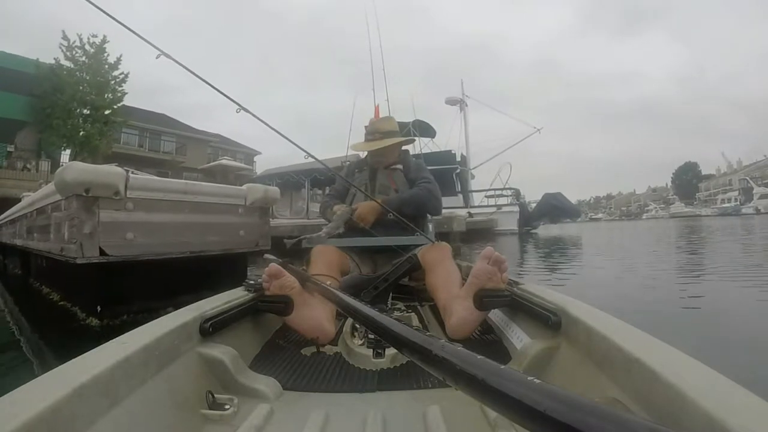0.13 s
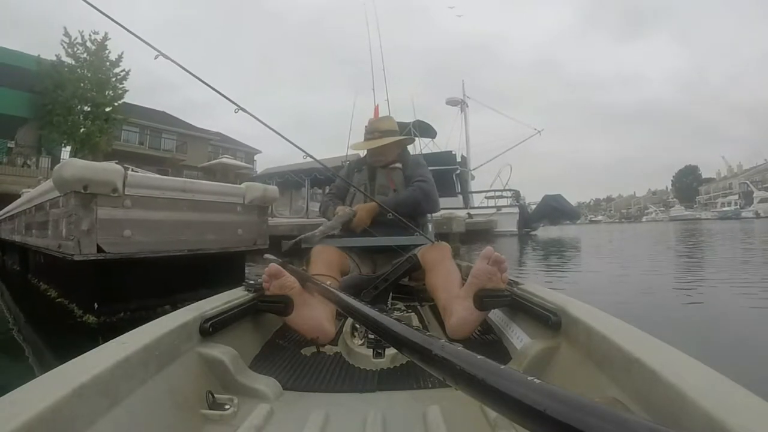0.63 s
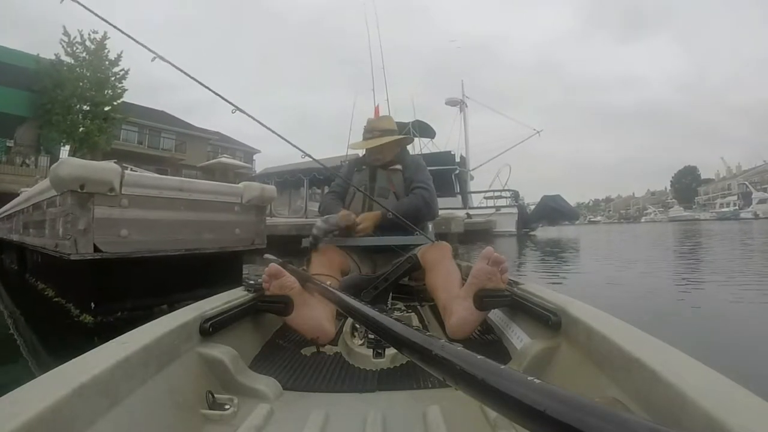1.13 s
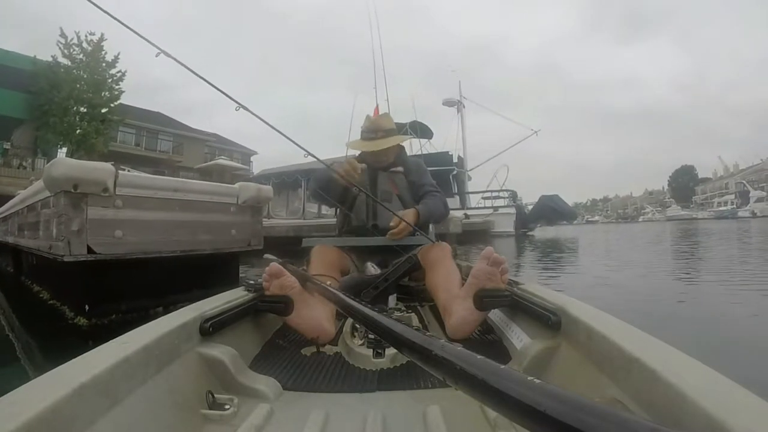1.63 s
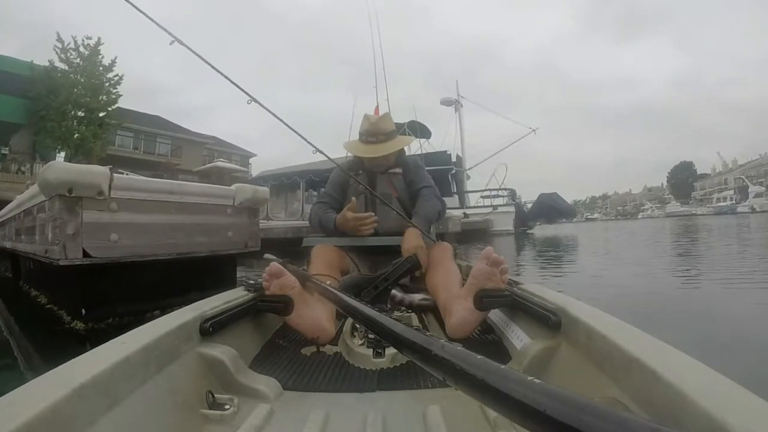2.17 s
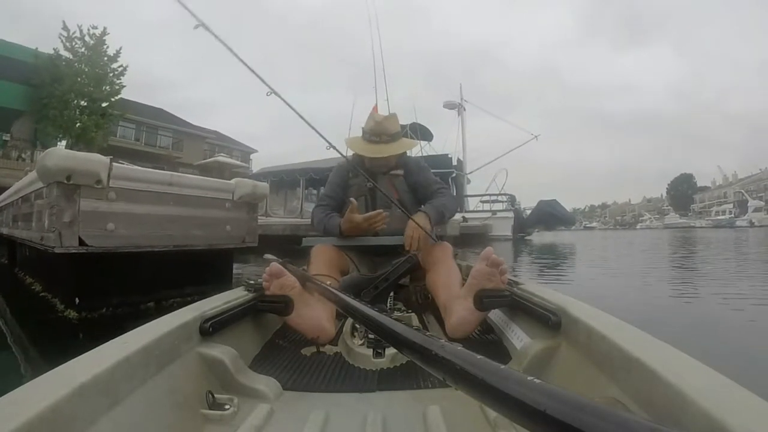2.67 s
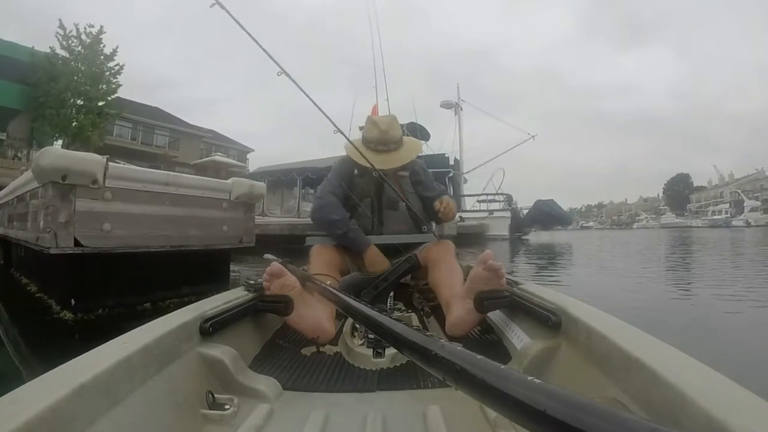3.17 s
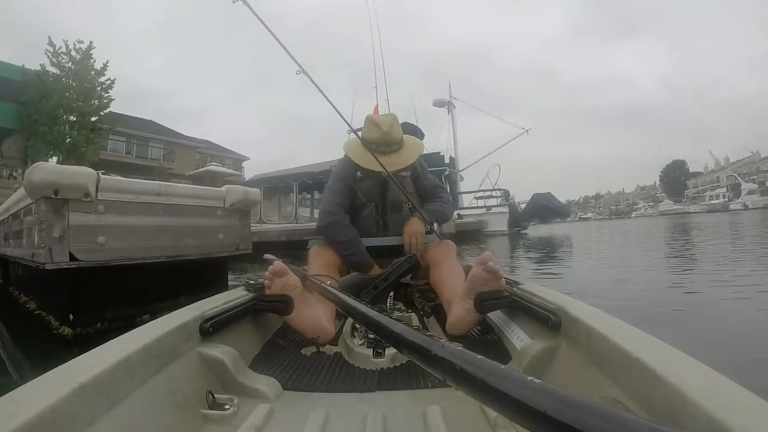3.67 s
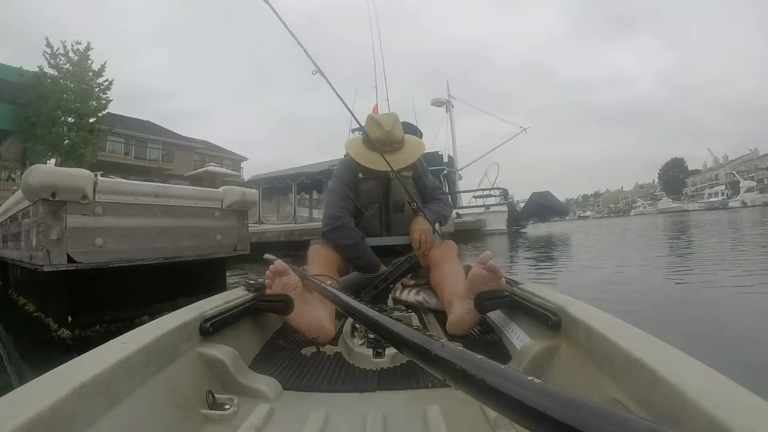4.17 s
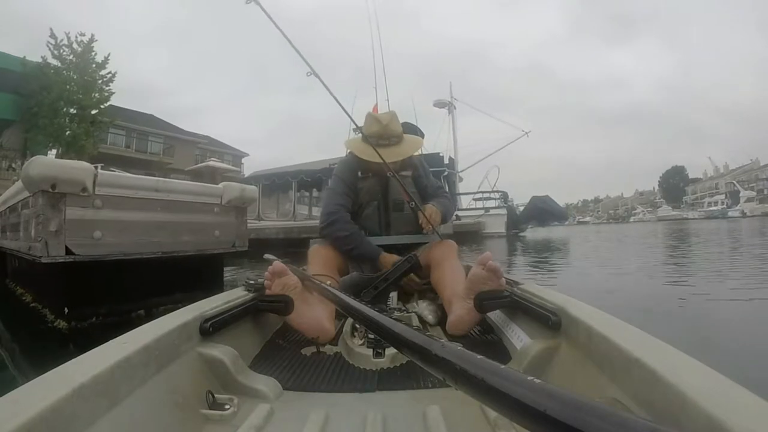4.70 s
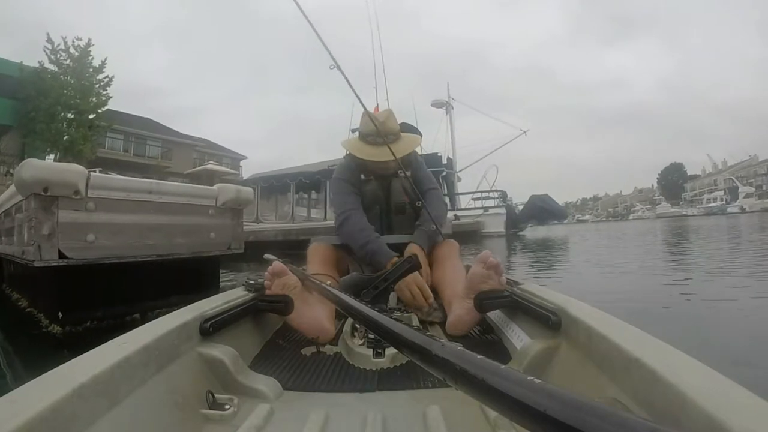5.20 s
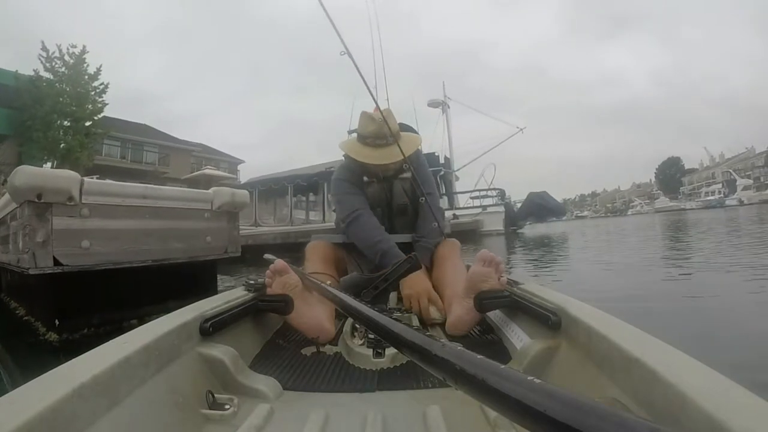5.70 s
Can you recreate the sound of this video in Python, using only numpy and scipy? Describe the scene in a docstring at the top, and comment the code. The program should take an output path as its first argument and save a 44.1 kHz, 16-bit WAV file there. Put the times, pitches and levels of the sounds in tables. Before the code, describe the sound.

A quiet, steady low-weighted hiss of harbour air and camera opens the scene, with faint thin treble ticks and a few small, hard tackle clicks around 0.8 to 1.4 seconds. From 1.5 seconds, hollow plastic hull knocks begin, with a strong boom near 1.75 and another near 2.4, joined by juddering rattles of loose fittings, gear rumble and a very low sway of the camera mount. It calms after 2.5. Near 3.1 comes a couple of light knocks and a short, rough, breathy squeak falling in pitch, then soft rustling. From about 3.9 to 5.0, a denser irregular run of thuds and clatter arrives, with a brief falling skid at 4.0 and hard hits near 4.1, 4.4, 4.5 and 4.75. Weaker bumps and dragging tail off by 5.6, leaving hiss. Everything is close, dry, boxy and muffled, with short decays.

```python
"""Knocks on the hull of a plastic kayak, heard inside a closed camera case fixed to it, are decaying hull modes.
Loose fittings chatter as judders of noise through the case resonances; the camera mount sways as a very low tone.
Dragged gear rumbles and rustles as lumpy filtered noise; small hard tackle gives bright noise clicks and brushes.
One squeak and one short skid are rough tones that fall in pitch.
Behind them lie a soft noise hiss of harbour air and camera, and faint, thin treble ticks."""
import sys
import numpy as np
from scipy import signal
from scipy.fft import rfft, irfft, next_fast_len
from scipy.io import wavfile
from scipy.ndimage import map_coordinates

SR = 44100
rng = np.random.default_rng(int(sys.argv[2]) if len(sys.argv) > 2 else 0)


def linear_from_db(decibels):
    """Turn decibels (scalar or array-like) into linear amplitude factors; 0 gives 1."""
    return 10 ** (np.asarray(decibels, float) / 20)


def log_audio(samples):
    """Write samples as a 16-bit WAV file to the path given in sys.argv[1]."""
    # one column per channel
    frames = np.atleast_2d(samples).T
    # limit to full scale, then quantise
    limited = np.clip(frames, -1, 1)
    pcm = np.round(limited * 32767).astype(np.int16)
    wavfile.write(sys.argv[1], SR, pcm)


N = 257047

# ringing modes of the hull, relative levels: pitch_hz, level_db, t60_s
HULL_MODES = [(50.6, -1, 0.13), (80.9, -4, 0.25), (123.6, 1.5, 0.15), (170.3, -9, 0.35),
              (211.3, -3.5, 0.21), (245, 3.5, 0.095), (274, -8, 0.19), (330.6, -10, 0.11),
              (385.8, -1, 0.095), (498, -6, 0.08), (688, -13, 0.087), (878, -20.5, 0.082),
              (1077, -32, 0.19)]
# resonances of the camera case, relative levels: pitch_hz, width_hz, level_db
CASE_RESONANCES = [(892, 195, -2), (1544, 95, 2.5), (1830, 242, 3), (2075, 350, 0), (2357, 91, -1.5),
                   (2820, 530, -8.5)]


def unit(x):
    """Scales a signal to rms 1."""
    return x / np.sqrt(np.mean(x ** 2) + 1e-20)


def along(points, hz):
    """Interpolates (Hz, value) points on a log frequency axis."""
    f, v = np.transpose(points)
    return np.interp(np.log(hz + 1), np.log(f + 1), v)


def curves(rows):
    """Draws one value per sample for each column after the time."""
    s, *columns = np.transpose(rows)
    return [np.interp(np.arange(N) / SR, s, column) for column in columns]


def wobble(rate):
    """A smooth random curve with rate knots a second."""
    knots = rng.standard_normal(int(N * rate / SR) + 4)
    return map_coordinates(knots, [np.arange(N) * rate / SR])


def filtered(x, response):
    """Filters x by a complex response of frequency."""
    size = next_fast_len(N + SR // 2)
    spectrum = rfft(x, size) * response(np.fft.rfftfreq(size, 1 / SR))
    return irfft(spectrum, size)[:N]


def coloured(spectrum):
    """Noise of rms 1 with the given (Hz, dB) spectrum."""
    return unit(filtered(rng.standard_normal(N), lambda hz: linear_from_db(along(spectrum, hz))))


def resonant(peaks):
    """Response of parallel (Hz, width Hz, dB) resonances with alternating signs."""
    def response(f):
        total = 0
        for k, (centre, width, db) in enumerate(peaks):
            loss = 1j * f * width
            total = total + (-1) ** k * linear_from_db(db) * loss / (centre * centre - f * f + loss)
        return total
    return response


def bursts(times, level_db, rise, t60):
    """Envelope of short contacts: a quick rise and an exponential fall."""
    t = np.arange(SR // 8) / SR
    shape = (1 - np.exp(-t / rise)) * linear_from_db(-60 * t / t60)
    spikes = np.bincount(np.round(times * SR).astype(int), linear_from_db(level_db), N)[:N]
    return np.abs(signal.fftconvolve(spikes, shape / shape.max())[:N])


def repeats(times, gap, count):
    """Each event and its repeats, one gap apart: times and repeat numbers."""
    k = np.arange(count)
    return (times[:, None] + gap * k).ravel(), np.tile(k, len(times))


def blows():
    """Each blow rebounds twice, usually weaker: rows (start_s, boom_db, deep_db, upper_db)."""
    # blows on the hull, levels before the trims of each layer; deep and upper are offsets of mode groups:
    # start_s, boom_db, deep_db, upper_db, loss_per_rebound_db
    blow_table = [(1.511, -15.5, -5.5, -1, 25), (1.541, -15, -2, -2.5, 5.5), (1.65, -31.5, -10, 4.5, 3),
                  (1.726, -18, 4, 5, 17.5), (1.753, -1.5, -6, -2.5, 11.5), (1.806, -16.5, 2.5, -25, 10),
                  (1.95, -14, -2, 2.5, 15), (1.967, -8.5, -2, -29, 17), (2.042, -22, 3.5, -22, 10.5),
                  (2.085, -20.5, -7, -25, 9.5), (2.146, -23, 0.5, -30, 10), (2.244, -24.5, -11, -19, 10),
                  (2.415, -5, -8.5, -3, 17), (2.427, -3, -25, -16.5, 18), (2.497, -16, 2, -7, 12),
                  (2.771, -35, -6, -29, 2), (3.052, -22, -15, -11, 20), (3.07, -19.5, -11.5, -8.5, 15),
                  (3.566, -39, -32, -1, -3.5), (3.767, -35, -37, -3, 3), (3.929, -28, -2.5, -1.5, 1.5),
                  (4.023, -28.5, 0.5, 0.5, 16.5), (4.044, -12.5, -11, -21, 18),
                  (4.111, -3.5, -3.5, -0.5, 22.5), (4.136, -11, -13, -3, 25), (4.204, -22, 6, -30, 19),
                  (4.363, -6, -2, -3, 6), (4.391, -11, -5.5, -15, 5.5), (4.497, -2, -10, -5, 24),
                  (4.636, -19, 1.5, -11.5, 31), (4.765, -3.5, -12.5, -5.5, 19), (4.945, -21.5, -3, -9, 28),
                  (5.024, -27, 3, 4.5, 20), (5.217, -32.5, 0, -24, 7.5), (5.301, -31.5, -30, -17, 6),
                  (5.473, -23, -27, -0.5, 5.5)]
    rebound_gap_s, brighten_db = 0.024, 0.5  # each rebound is slightly stronger in the upper modes
    s, k = repeats(np.transpose(blow_table)[0], rebound_gap_s, count=3)
    _, boom_db, deep_db, upper_db, loss_db = np.repeat(blow_table, 3, axis=0).T
    return np.transpose([s, boom_db - loss_db * k, deep_db, upper_db + brighten_db * k])


def knocks():
    """Each blow rings the decaying hull modes in its own shares, with slightly varied pitch and phase."""
    out = np.zeros(N + SR)
    t = np.arange(SR // 4) / SR
    hz, mode_db, t60 = np.transpose(HULL_MODES)[:, :, None]
    attack = (1 - np.exp(-t / 0.0018)) ** 2
    lead_s, trim_db = 0.0015, -1.5  # the soft attack begins a little early
    for s, boom_db, deep_db, upper_db in blows():
        size, detune, turn = rng.standard_normal((3, len(HULL_MODES), 1))
        group_db = np.where(hz < 145, deep_db, np.where(hz > 350, upper_db, 0))
        even = linear_from_db(mode_db + group_db)
        share = even * linear_from_db(2 * size)
        share = share * np.linalg.norm(even) / np.linalg.norm(share)  # same summed mode power
        mode_hz = hz * (1 + 0.037 * detune)
        ring = share * linear_from_db(-60 * t / t60) * np.sin(2 * np.pi * mode_hz * t + 0.63 * turn)
        start = round((s - lead_s) * SR)
        out[start:][:len(t)] += linear_from_db(boom_db + trim_db) * attack * ring.sum(0)
    return out[:N]


def sway():
    """The mount swings as one slow, lopsided spring: pushes raise or damp it, then it fades."""
    # pushes on the camera mount: start_s, sway_rms_after_db, time_to_take_hold_s
    push_table = [(0.86, -46.5, 0.064), (1.117, -32.5, 0.091), (1.398, -34.5, 0.01), (1.499, -13.5, 0.043),
                  (1.71, -21.5, 0.04), (1.947, -13.5, 0.1), (2.201, -15, 0.1), (2.414, -26.5, 0.028),
                  (2.43, -22.5, 0.036), (2.58, -33.5, 0.09), (2.644, -29, 0.23), (3.548, -41.5, 0.12),
                  (3.68, -44, 0.093), (3.786, -51, .04), (3.928, -19.5, 0.038), (4.145, -18, 0.074),
                  (4.35, -23.5, 0.045), (4.432, -21, 0.12), (4.888, -23, 0.1), (5.037, -35.5, 0.079),
                  (5.196, -20.5, 0.11)]
    rest_db, fade_db_per_s = -81, 35
    s, db, rise = np.transpose(push_table)
    held = s + rise
    before = np.append(rest_db, db[:-1] - fade_db_per_s * (s[1:] - held[:-1]))
    end = N / SR
    last = (end, db[-1] - fade_db_per_s * (end - held[-1]))
    level_db, = curves(sorted([*zip(s, before), *zip(held, db), last]))
    phase = 2 * np.pi * np.cumsum(36.9 + 0.86 * wobble(5)) / SR
    lopsided = np.sin(phase) + 0.064 * np.sin(2 * phase + 0.62)
    return np.sqrt(2) * linear_from_db(level_db) * lopsided


def chatter():
    """Loose fittings scrape the shell for milliseconds and ring the case; hull blows shake them too."""
    # contacts of fittings, levels before the body and edge gains: start_s, peak_db, loss_per_bounce_db
    contact_table = [(1.505, -36, 24), (1.52, -24.5, 20), (1.549, -17.5, 20.5), (1.645, -39.5, 20),
                     (1.71, -38.5, 4), (1.725, -31.5, 16), (1.739, -25.5, 26), (1.763, -21.5, 6),
                     (1.944, -35.5, 5), (1.977, -25.5, 21.5), (2.201, -38.5, 19), (2.229, -34.5, 7.5),
                     (2.306, -42.5, 14), (2.383, -30, 12), (2.407, -10.5, 19), (2.45, -28.5, 6),
                     (2.488, -33, 11), (3.049, -37.5, 6.5), (3.924, -35.5, 24), (3.969, -47, 21),
                     (4.004, -26.5, 25), (4.107, -28, 21), (4.119, -19, 13), (4.308, -34.5, 4),
                     (4.355, -25.5, 33), (4.367, -20.5, 7.5), (4.397, -19, 5.5), (4.495, -9.5, 33),
                     (4.52, -22, 25), (4.532, -21, 2), (4.587, -31.5, 20), (4.758, -15, 22),
                     (4.787, -29, 23), (4.879, -41, 29), (5.021, -36, 4.5), (5.47, -30.5, 43),
                     (5.556, -46, 15)]
    # bright edge of a contact: pitch_hz, level_db
    edge_spectrum = [(3000, -14), (3800, 6), (5000, 0), (6500, -2.5), (9000, -30), (13000, -39.5)]
    bounce_gap_s, muffle_hz = 0.02, 3630  # the case passes little of a scrape above this
    s, k = repeats(np.transpose(contact_table)[0], bounce_gap_s, count=3)
    _, db, loss_db = np.repeat(contact_table, 3, axis=0).T
    blow_s, boom_db, _, upper_db = blows().T
    shake = bursts(s, db - loss_db * k, 0.001, 0.047)
    shake = shake + bursts(blow_s, boom_db + upper_db - 26, 0.0032, 0.12)
    shake = shake * linear_from_db(2.44 * wobble(250))  # the contact judders
    scrape = rng.standard_normal(N)

    def muffled(peaks):
        return lambda f: resonant(peaks)(f) / (1 + (f / muffle_hz) ** 6)

    body = 0
    for pair in np.split(np.array(CASE_RESONANCES), 3):  # pairs of resonances waver apart
        body = body + filtered(shake * linear_from_db(1.5 * wobble(30)) * scrape, muffled(pair))
    body = body / np.std(filtered(scrape, muffled(CASE_RESONANCES)))
    return linear_from_db(-7.0) * body + linear_from_db(-34.0) * shake * coloured(edge_spectrum)


def drag():
    """Gear sliding over the deck excites hull and case in uneven, lumpy slips."""
    # drag over time: time_s, pressure_db (level of the hull rumble), rustle_db (case, relative to the rumble)
    drag_table = [(1.08, -57.5, -11), (1.2, -46, -19), (1.45, -61.5, -8.5), (1.6, -42.5, -20.5),
                  (2.3, -35, -19.5), (2.6, -51, -23.5), (3.3, -49, -8.5), (3.4, -53.5, -15.5),
                  (3.557, -62, -11), (3.568, -47.5, -6.5), (3.64, -50, -11.5), (3.68, -48, -19.5),
                  (3.9, -43.5, -9), (4.3, -33.5, -21.5), (5.08, -43, -22), (5.14, -45, -18),
                  (5.46, -48, -16), (5.6, -49.5, -15.5), (5.83, -63.5, -10)]
    pressure_db, rustle_db = curves(drag_table)
    slips = wobble(40)
    # mode widths follow from the decay times; upper modes are 5 dB weaker here
    hull = resonant([(hz, 5.4 / t60, db - (5.0 if hz > 350 else 0)) for hz, db, t60 in HULL_MODES])
    rumble = unit(filtered(linear_from_db(2 * slips) * rng.standard_normal(N), hull))
    case_slips = linear_from_db(2.9 * slips + 2.9 * wobble(150))
    rustle = unit(filtered(case_slips * rng.standard_normal(N), resonant(CASE_RESONANCES)))
    return linear_from_db(pressure_db) * (rumble + linear_from_db(rustle_db) * rustle)


def clicks():
    """Small hard tackle ticks and brushes: short noise with a body and a quicker bright top."""
    # clicks, levels before the trims below: start_s, peak_db, top_db (relative to the peak)
    click_table = [(0.846, -34.5, -10.5), (0.959, -45.5, -21), (1.1827, -35, -17.5), (1.402, -49.5, -4),
                   (1.4147, -47.5, -8), (1.51, -34.5, -23), (1.903, -31.5, -16), (2.223, -43, -27),
                   (2.261, -53, -4), (2.385, -49, -15), (2.407, -30.5, -15.5), (4.109, -50.5, -10),
                   (4.357, -51, -9), (4.154, -47, -18), (4.418, -56.5, -7), (4.497, -39.5, -11.5),
                   (4.71, -54, -25), (4.76, -43, -8), (4.9427, -47, -29)]
    # body spectrum of the tackle: pitch_hz, level_db
    body_spectrum = [(760, -62), (1300, -41), (1600, 2.5), (3040, -12), (3320, -1.5), (4520, 5.5),
                     (9000, -15.5), (11700, -49.5), (19800, -120)]
    s, db, top_db = np.transpose(click_table)
    top = coloured([(6500, -30.0), (8500, 4.5), (12000, 5.5), (14500, -1.5), (15800, -37.0)])
    brush = brushes()
    body_level = bursts(s, db - 2.5, 0.0001, 0.033) + brush
    top_level = bursts(s, db + top_db - 3.5, 0.00039, 0.015) + linear_from_db(-16.5) * brush
    return body_level * coloured(body_spectrum) + top_level * top


def brushes():
    """Tackle brushes past something: envelope of short grainy scrapes that swell and fade."""
    # brushes: middle_s, length_s, level_db (before the grain)
    brush_table = [(0.978, .04, -62.5), (1.373, 0.035, -60), (1.729, 0.063, -50.5), (2.226, 0.075, -51),
                   (3.917, 0.068, -57.5), (4.308, 0.036, -42)]
    t = np.arange(N) / SR
    swell = 0
    for middle, length, db in brush_table:
        swell = swell + linear_from_db(db) * np.cos(np.pi * np.clip((t - middle) / length, -0.5, 0.5)) ** 2
    return swell * linear_from_db(3.5 * wobble(160))


def squeak():
    """A rubbed line squeaks as it slackens: rough, breathy stick-slip, swelling as its pitch falls."""
    start_s, length_s, attack_s, release_s = 3.088, 0.104, 0.031, 0.006
    taut_hz, slack_hz, slacken_s = 3400, 1200, 0.062  # falls from taut towards slack
    gate_db, swell_db = -42, 2.5
    t = np.arange(N) / SR - start_s
    hz = slack_hz + (taut_hz - slack_hz) * np.exp(-np.clip(t, 0, length_s) / slacken_s)
    phase = 2 * np.pi * np.cumsum(hz * (1 + 0.025 * wobble(60))) / SR
    grip = linear_from_db(3 * wobble(500) + 2.6 * wobble(110))
    tone = grip * np.sin(phase + 1.2 * wobble(600))
    overtone = linear_from_db(3 * wobble(300)) * np.sin(2 * phase + 1.3 * wobble(600))
    edges = np.clip(np.minimum(t / attack_s, (length_s - t) / release_s), 0, 1)
    gate = edges * linear_from_db(gate_db + swell_db * np.clip(t / length_s, 0, 1))
    # small fixed parts ring at steady pitches
    parts = unit(filtered(rng.standard_normal(N), resonant([(5670, 86, 8.5), (7000, 430, -11.0)])))
    rasp = coloured([(1200, -27.5), (1700, 6.5), (2900, 4.5), (5500, -4), (9000, -45)])
    direct = gate * (1.36 * tone + linear_from_db(-18.5) * parts + linear_from_db(-11) * rasp)
    # the overtone is loudest on one broad resonance
    upper = filtered(gate * overtone, resonant([(4200, 400, -2.9)]))
    case_ring = 0.3 * filtered(gate * tone, resonant(CASE_RESONANCES))
    return direct + upper + case_ring


def skid():
    """A hard edge skids over the deck: a rough tone of slips whose rate falls as the edge slows."""
    start_s, level_db, fade_db_per_s = 4.003, -30.5, 147.5
    start_hz, end_hz, slows_s = 2400, 250, 0.02
    t = np.clip(np.arange(N) / SR - start_s, 0, None)
    hz = end_hz + (start_hz - end_hz) * np.exp(-t / slows_s)
    phase = 2 * np.pi * np.cumsum(hz * (1 + 0.12 * wobble(90))) / SR
    slips = linear_from_db(3 * wobble(400)) * np.sin(phase + 1.6 * wobble(500))
    fade = linear_from_db(level_db - fade_db_per_s * t - 60 * (t / 0.09) ** 4)  # the last term ends it firmly
    return (1 - np.exp(-t / 0.003)) * fade * slips


def ticks():
    """Faint, short, thin treble noise ticks on random beats of a steady grid, about ten beats a second."""
    tick_share = 0.27  # chance that a beat ticks
    s = np.arange(0.062, N / SR, 0.1024)
    s = s[rng.random(len(s)) < tick_share]
    thin = coloured([(7000, -26.0), (10000, 13.0), (13000, -11), (15000, -19)])
    return bursts(s, np.full(len(s), -66.0), 0.0015, 0.013) * thin


def hiss():
    """Steady noise of harbour air and camera that breathes a little."""
    # hiss spectrum, relative levels: pitch_hz, level_db
    hiss_spectrum = [(15, -22.5), (25, 8), (413, -7), (541, -10), (587, -7), (1060, -13), (3580, -19),
                     (13100, -34), (15300, -50), (16000, -92)]
    level_db = -56.5
    return linear_from_db(level_db + 0.16 * wobble(1.3)) * coloured(hiss_spectrum)


def scene():
    """Sums every source at one microphone."""
    handling = knocks() + sway() + chatter() + drag() + clicks() + squeak() + skid()
    return (handling + ticks() + hiss())[None]


def top_cut(x):
    """Nothing passes above the cut-off."""
    return signal.sosfilt(signal.butter(12, 15930, fs=SR, output="sos"), x)


def record(dry):
    """A soft limit rounds off the hardest peaks below full scale."""
    mix = dry / (1 + np.abs(dry) ** 6) ** (1 / 6)
    return top_cut(mix)


dry = scene()
out = record(dry)
log_audio(out)
```